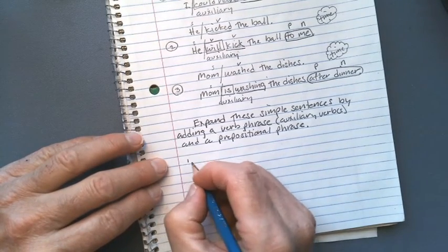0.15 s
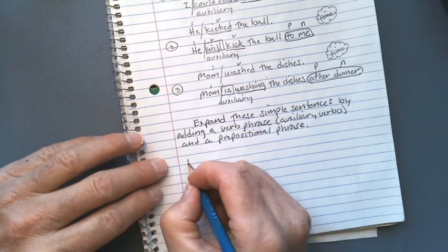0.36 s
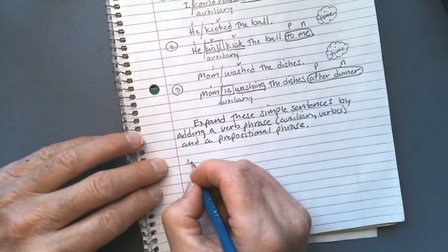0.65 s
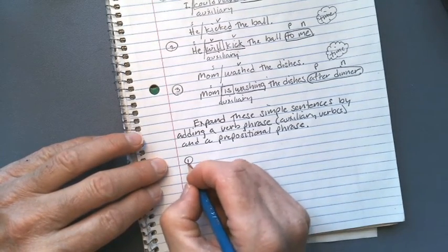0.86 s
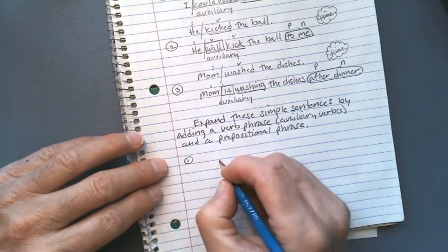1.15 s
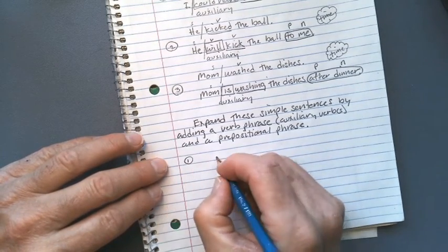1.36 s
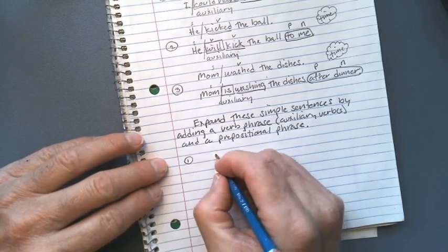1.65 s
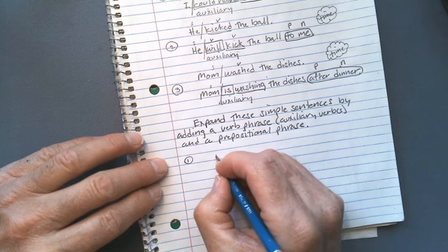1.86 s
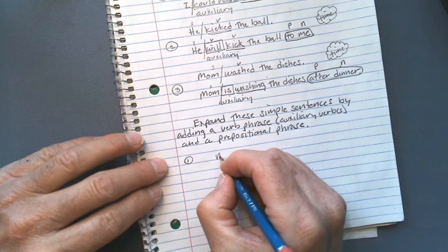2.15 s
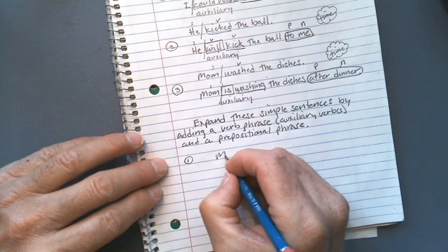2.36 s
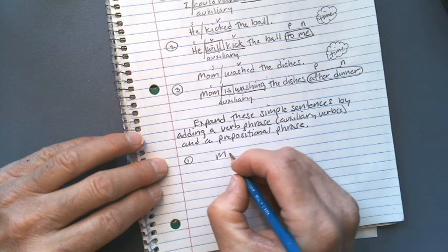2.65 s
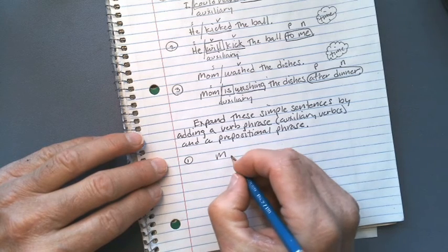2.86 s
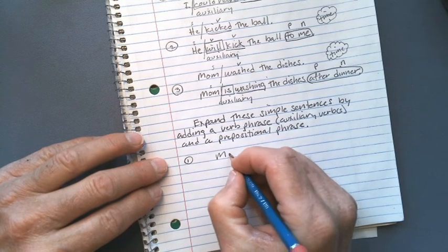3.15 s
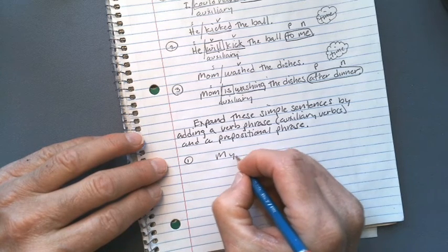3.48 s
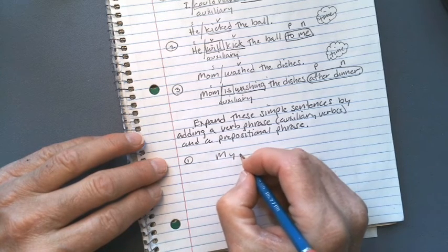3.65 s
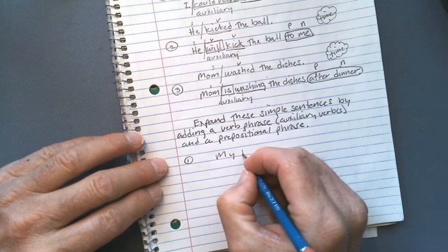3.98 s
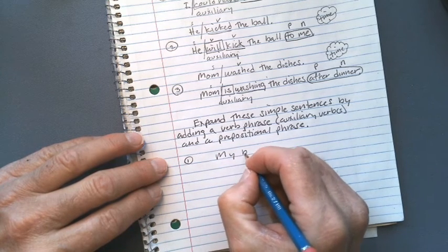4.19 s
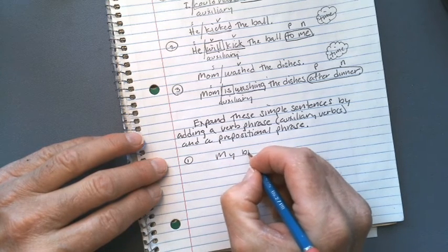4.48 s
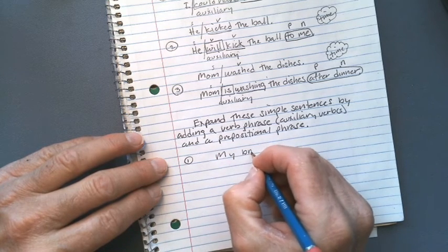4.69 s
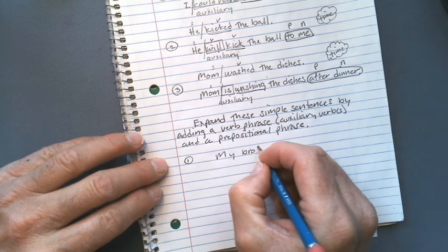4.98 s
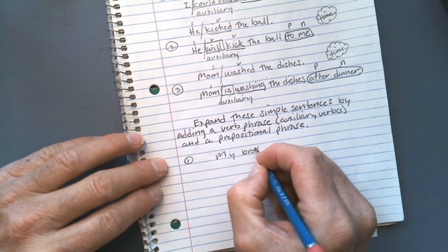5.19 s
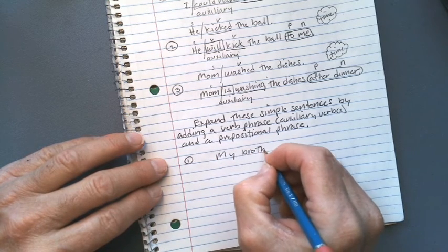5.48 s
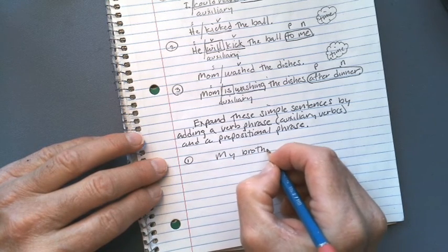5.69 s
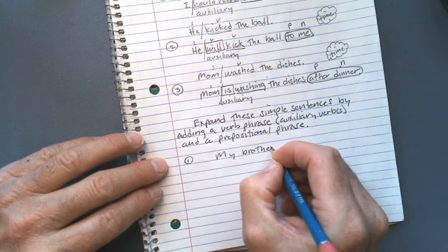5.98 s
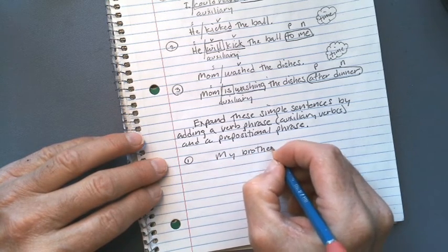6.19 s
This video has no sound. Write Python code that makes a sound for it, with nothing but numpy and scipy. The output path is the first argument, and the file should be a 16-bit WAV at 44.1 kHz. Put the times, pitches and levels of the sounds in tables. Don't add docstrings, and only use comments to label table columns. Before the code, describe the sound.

Close to a small microphone in a quiet room, a pencil writes on a notebook on a desk. A brief cluster of dry scratches comes first, then a pause, then short runs of strokes with small gaps. Soft, very low thumps follow the hand's pushes, growing firmer later, over faint fan rumble, mains hum and hiss.

```python
import sys
import numpy as np
from scipy import signal
from scipy.fft import rfft, irfft
from scipy.io import wavfile
from scipy.ndimage import uniform_filter1d

SR = 44100
rng = np.random.default_rng(int(sys.argv[2]) if len(sys.argv) > 2 else 0)


def decibels_to_gain(level_db):
    exponent = np.asarray(level_db, float) / 20
    return 10 ** exponent


def wav_record(signal):
    frames = np.transpose(np.atleast_2d(signal))
    bounded = np.clip(frames, -1, 1)
    quanta = np.round(bounded * 32767).astype(np.int16)
    wavfile.write(sys.argv[1], SR, quanta)


N = 279153


def pencil():
    # (fastest moment [s], length [s], scratch level [dB],
    # relative shaft level [dB], lean to the tip [dB])
    strokes = [(.53, .05, -66, -10, -2), (0.583, .085, -59.5, -10, -6), (0.638, .04, -62.5, -1, -3),
               (0.683, 0.052, -57, -12, -5), (0.747, 0.063, -63, -2.5, -3),
               (0.85, .066, -66.5, -6, -1), (1.797, 0.067, -63.5, -7, -1),
               (1.922, 0.065, -60.5, -10, -2), (2.021, 0.053, -63, -4.5, 0),
               (2.126, 0.049, -59.5, -10.5, -3), (2.202, 0.06, -61, -6.5, 0),
               (2.4, 0.096, -70.5, -12, 0), (3.148, .055, -68.5, -5, 1), (3.226, 0.042, -63, -7, -3),
               (3.3, .06, -61.5, 0, -0.5), (3.392, .04, -72, -5, -1), (3.446, 0.063, -71.5, -2, -2),
               (3.88, 0.059, -62.5, -2.5, 0), (3.992, 0.068, -63, -7, 1), (4.06, 0.054, -65, -2, 2),
                    (4.132, 0.054, -69.5, -4, 1), (4.345, 0.046, -65.5, -2, 2), (4.45, 0.059, -65.5, -1, 0),
                    (4.546, 0.072, -67, -4, 1), (4.632, .046, -63.5, -7, -2), (4.696, .06, -66, -5, -3),
                    (4.908, 0.056, -61.5, -2.5, 2.5), (5.153, 0.081, -63.5, -10, -3),
                    (5.22, 0.057, -62.5, -1.5, 3), (5.33, 0.046, -63, -6, 2), (5.403, 0.061, -67, -4, 3),
                    (5.486, .044, -72, -8, 0), (5.66, .054, -67.5, -2, -1), (5.732, 0.062, -64, -3.5, -1),
                    (5.818, 0.071, -61, -8.5, -1), (6.228, 0.047, -65.5, -6, 3), (6.335, 0.054, -58, -7, 2)]
    # (frequency [Hz], width [Hz], level [dB])
    shaft_modes = [(1100, 600, -2), (1700, 600, -3), (2300, 650, -2), (2900, 800, 0), (3800, 900, -10)]
    # (frequency [Hz], width [Hz], level [dB])
    tip_modes = [(7450, 750, 0), (8150, 800, -3)]
    # (frequency [Hz], width [Hz], level [dB])
    sheet_modes = [(9520, 1230, -6.5), (10620, 1000, -0.5), (11720, 1300, -5)]
    # (frequency [Hz], width [Hz], level [dB])
    lead_modes = [(5910, 550, -2), (6650, 900, -2.5)]
    # (frequency [Hz], width [Hz], level [dB])
    rasp_modes = [(4400, 1500, -3.5), (6600, 4300, -3), (8700, 1800, 4), (10800, 3100, -8),
                  (12600, 1700, 0), (14600, 3400, -2)]

    slips_per_s = 12000
    slip_size = decibels_to_gain(2.0 * np.minimum(rng.exponential(1, N), 5))
    slips = slip_size * (rng.random(N) < slips_per_s / SR) * decibels_to_gain(0.63 * drift(N, 150))

    power, shaft_db, lean_db = np.zeros((3, N))
    for peak_s, length, db, shaft, lean in strokes:
        stroke = arch(peak_s, length, db, rise_share=0.4, blunt=2.65)
        power += stroke
        shaft_db += shaft * stroke
        lean_db += lean * stroke
    shaft_db /= power
    lean_db /= power

    tip_db = -8 + lean_db
    sheet_db = -5 - 0.7 * lean_db
    lead_db = -8 - 0.27 * lean_db
    scratch = decibels_to_gain(lead_db) * body(slips, lead_modes, 0.0055)
    scratch += decibels_to_gain(-5) * body(slips, rasp_modes, 0.0093)
    scratch += decibels_to_gain(shaft_db) * body(slips, shaft_modes, 0.027)
    scratch += decibels_to_gain(tip_db) * body(slips, tip_modes, 0.0092)
    scratch += decibels_to_gain(sheet_db) * body(slips, sheet_modes, 0.0071)
    return np.sqrt(power) * scratch


def hand():
    # (middle [s], half length [s], level [dB])
    slides = [
        (.86, 0.041, -67.5),
        (2.41, .04, -70),
        (3.44, 0.069, -72.5),
        (5.99, 0.11, -73),
    ]
    # (frequency [Hz], width [Hz], level [dB])
    skin_modes = [(4460, 3200, 0.5), (6100, 3200, -3), (9000, 2700, -0.5)]
    t = np.arange(N) / SR
    press = sum(decibels_to_gain(db) * np.exp(-((t - middle) / half) ** 4) for middle, half, db in slides)
    return press * body(rng.standard_normal(N), skin_modes, 0.01)


def desk():
    # (strongest moment [s], length [s], level [dB])
    pushes = [(0.005, 0.07, -43.5), (.09, .07, -54), (.53, 0.11, -44), (0.657, 0.11, -47),
              (.86, 0.077, -41.5), (.98, 0.15, -51), (1.54, .3, -56), (1.973, 0.14, -43), (2.066, .07, -47),
              (2.2, .15, -44), (2.536, 0.13, -52), (2.75, .09, -58), (2.87, 0.14, -49.5),
              (3.15, 0.12, -45.5), (3.337, .12, -46), (3.465, 0.082, -48), (3.906, .13, -38),
              (4.2, 0.25, -50), (4.472, 0.11, -40), (4.71, 0.23, -53), (4.922, 0.092, -37.5),
              (5.03, .07, -47), (5.137, .11, -37), (5.31, 0.13, -44.5), (5.608, 0.093, -39),
              (5.872, 0.15, -44.5), (6.067, 0.15, -48.5), (6.29, 0.11, -43)]
    desk_hz, rest_db = 40.34, -62
    power = decibels_to_gain(2 * (rest_db + 2.2 * drift(N, 11)))
    power += sum(arch(*push, rise_share=0.41, blunt=1.6) for push in pushes)
    turns = np.cumsum(desk_hz + 2.624 * drift(N, 11.77)) / SR
    thump = np.sqrt(2) * np.sin(2 * np.pi * turns)
    jolt = evened(resonate(rng.standard_normal(N), np.full(N, 58.0), 40))
    return np.sqrt(power) * (thump + decibels_to_gain(-12) * jolt)


def room(x):
    decay_s = 0.06
    taps = np.zeros(6000)
    at = np.arange(60, 5980, 20) + rng.integers(0, 20, size=296)
    taps[at] = rng.choice([-1.0, 1.0], size=296) * decibels_to_gain(-60 * at / SR / decay_s)
    return signal.oaconvolve(x, taps / np.linalg.norm(taps))[:N]


def air():
    # (frequency [Hz], density [dB per Hz])
    air_spectrum = [(5, -0.5), (14, 3), (25, -9), (75, -20.5), (100, -17), (160, -19.5), (230, -13), (450, -20),
                    (900, -30), (1900, -36.5), (3000, -38.5), (5500, -41.5), (7500, -44.5), (9800, -40.5),
            (12000, -43), (16000, -45.5)]
    # (frequency [Hz], width [Hz], height [dB])
    duct = [(195, 17, 6.8), (214.4, 13.4, 6.8), (238.4, 6, 3.1), (275, 24, 4.9), (377, 22, 5.8),
            (410.5, 11, 7), (521, 54, 7.14), (606, 26, 3.8), (668, 10, 6), (753.3, 28.3, 11.3),
            (836, 22, 4.4), (940, 16, 4.7), (1060, 28, 5.9), (1310, 35, 5.5)]
    hz = np.fft.rfftfreq(N, 1 / SR)
    humps_db = sum(db / (1 + (2 * (hz - centre) / width) ** 2) for centre, width, db in duct)
    return decibels_to_gain(-52.5) * coloured(read(air_spectrum, hz) + humps_db)


def hum():
    # (frequency [Hz], rms level [dB])
    mains = [(60, -52), (120, -62.5)]
    t = np.arange(N) / SR
    total = np.zeros(N)
    for hz, db in mains:
        level = np.sqrt(2) * decibels_to_gain(db + 1.0 * drift(N, 5.4))
        total += level * np.sin(2 * np.pi * (hz * t + rng.random()))
    return total


def specks():
    # (frequency [Hz], density [dB per Hz])
    side_hiss = [(100, -25), (1000, -13), (4000, -6), (10000, -1.5), (16000, 0)]
    side_bursts = [.49, .85, 2.3, 3.85, 4.22, 4.45, 5.45, 5.55, 5.6, 5.8]
    frames, hz = N // 1024 + 3, np.fft.rfftfreq(2048, 1 / SR)
    t = np.arange(frames) * 1024 / SR
    puffs = sum(0.12 * (abs(t - moment) < 0.012) for moment in side_bursts)
    live = rng.random((frames, len(hz))) < 0.012 + puffs[:, None]
    phase = np.exp(2j * np.pi * rng.random(live.shape))
    z = live * phase * decibels_to_gain(read(side_hiss, hz))
    return decibels_to_gain(-80.5) * evened(signal.istft(z.T, nperseg=2048, noverlap=1024)[1][:N])


def arch(peak_s, length, db, rise_share, blunt):
    dt = np.arange(N) / SR - peak_s
    flank = np.where(dt < 0, -dt / rise_share, dt / (1 - rise_share)) / length
    return decibels_to_gain(2 * np.maximum(db - 6 * flank ** blunt, -150))


def body(drive, modes, wander):
    n = len(drive)
    kicks = drive * rng.choice([-1.0, 1.0], n)
    total = np.zeros(n)
    for k, (hz, width, db) in enumerate(modes):
        swell = decibels_to_gain(db + 1.6 * drift(n, 24))
        ring = resonate(kicks, hz * (1 + wander * drift(n, 5.6)), width)
        total += (-1) ** k * swell * ring
    return evened(total)


def resonate(x, hz, width):
    turn = np.exp(2j * np.pi * np.cumsum(hz) / SR)
    r = np.exp(-np.pi * width / SR)
    smooth = signal.lfilter([(1 - r) ** 2], [1, -2 * r, r * r], x / turn + 1e-18)
    return 2 * (turn * smooth).real


def drift(length, per_s):
    span = max(int(SR / per_s), 1)
    once = uniform_filter1d(rng.standard_normal(length), span)
    return evened(uniform_filter1d(once, span))


def coloured(gain_db):
    return evened(irfft(rfft(rng.standard_normal(N)) * decibels_to_gain(gain_db), N))


def read(points, hz):
    f, value = np.transpose(points)
    return np.interp(np.log(hz + 1), np.log(f + 1), value)


def evened(x):
    return x / np.sqrt(np.mean(x ** 2) + 1e-20)


def scene():
    writing = pencil() + hand()
    mono = decibels_to_gain(-1.0) * writing + decibels_to_gain(-9.5) * room(writing)
    mono += desk() + hum() + air()
    return np.array([mono, mono])


def top_cut(x):
    return signal.sosfilt(signal.butter(12, 15910, fs=SR, output="sos"), x)


def record(dry):
    edge_hz = 15730
    side = specks()
    both = dry + np.array([side, -side]) - 0.0002
    both = irfft(rfft(both) * (np.fft.rfftfreq(N, 1 / SR) < edge_hz), N)
    return top_cut(both)


dry = scene()
out = record(dry)
wav_record(out)
```